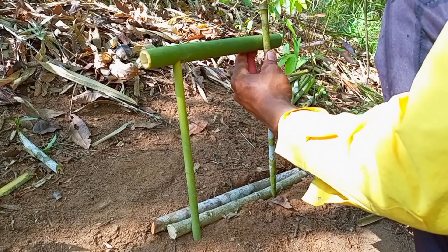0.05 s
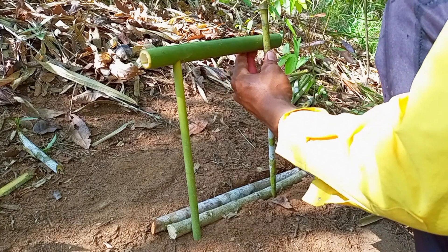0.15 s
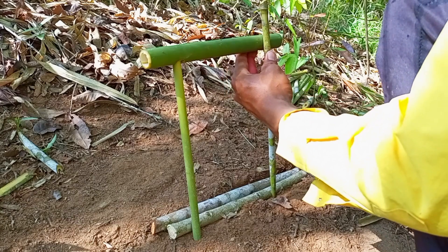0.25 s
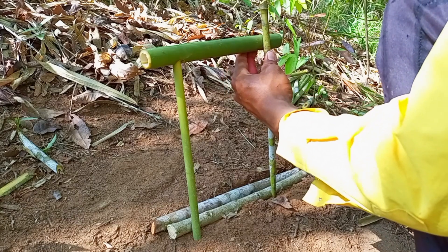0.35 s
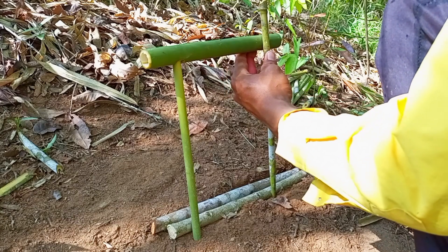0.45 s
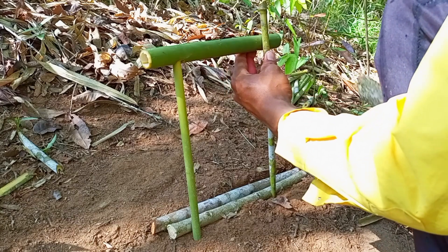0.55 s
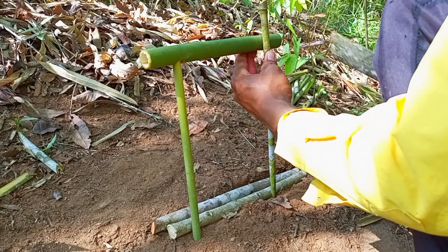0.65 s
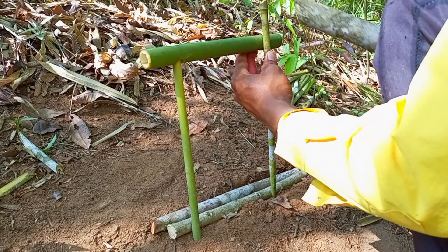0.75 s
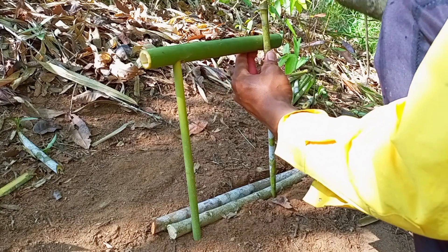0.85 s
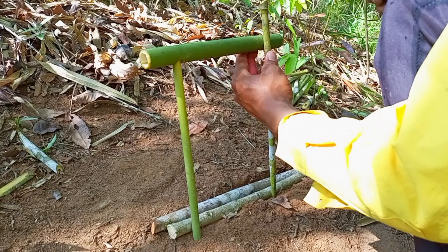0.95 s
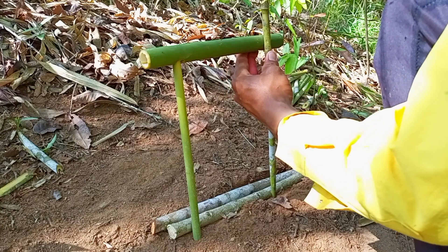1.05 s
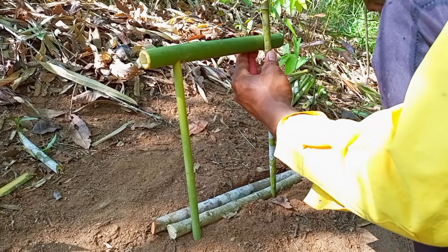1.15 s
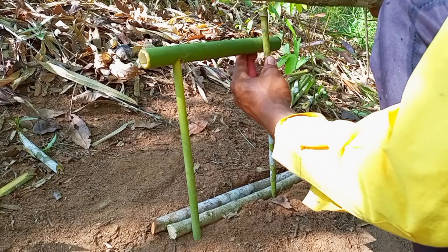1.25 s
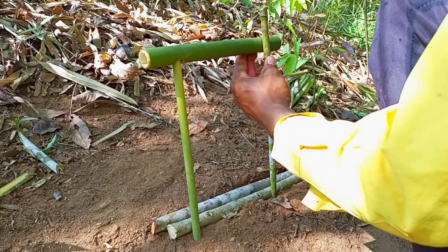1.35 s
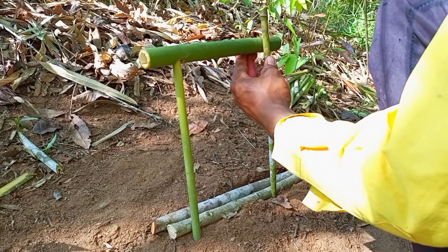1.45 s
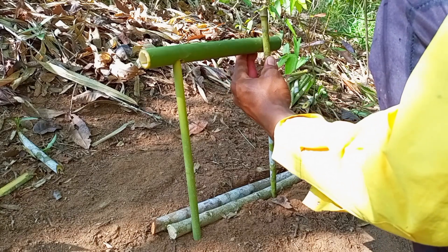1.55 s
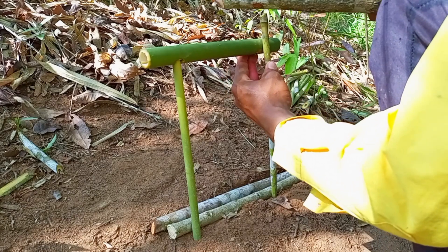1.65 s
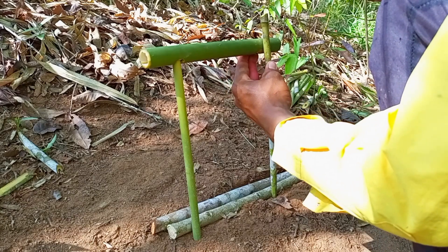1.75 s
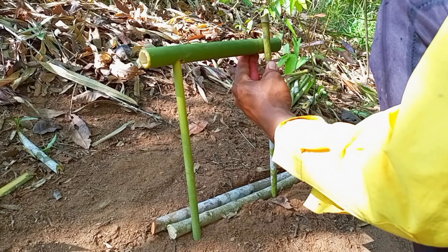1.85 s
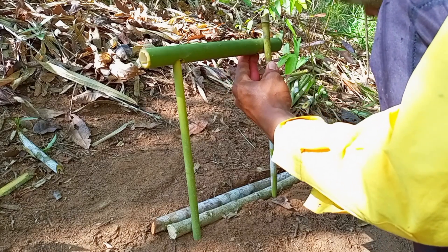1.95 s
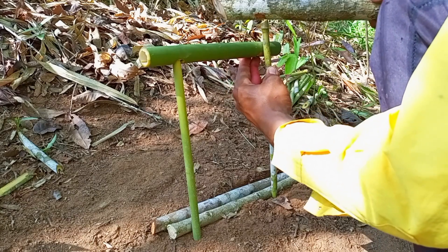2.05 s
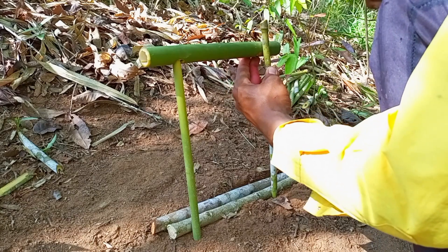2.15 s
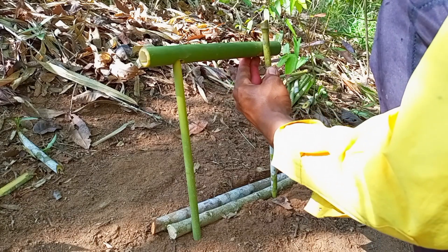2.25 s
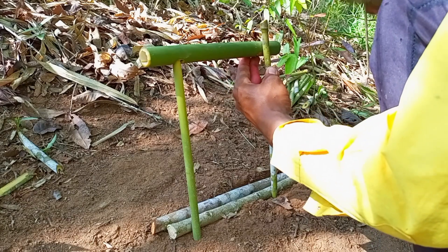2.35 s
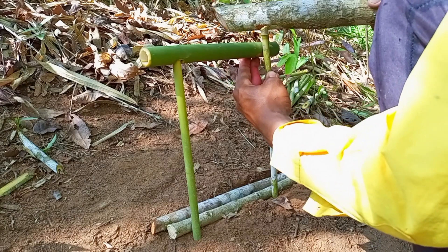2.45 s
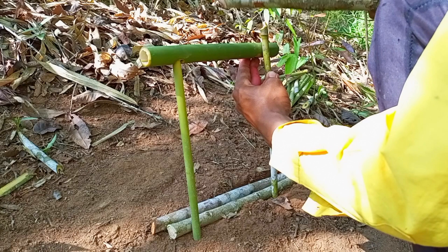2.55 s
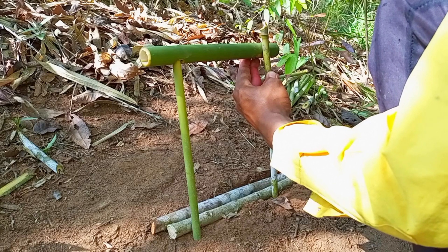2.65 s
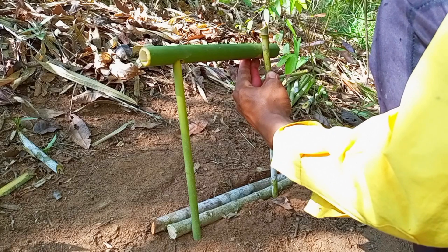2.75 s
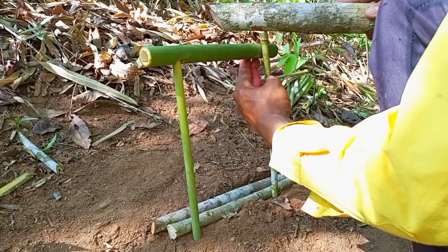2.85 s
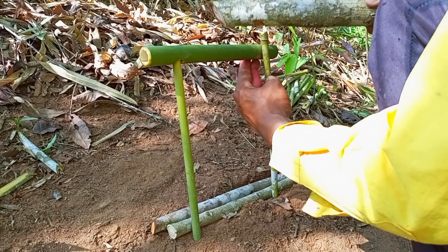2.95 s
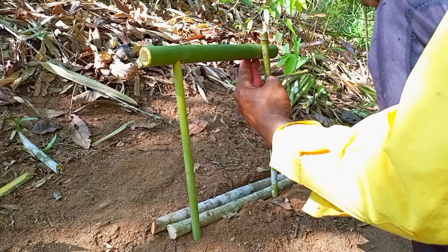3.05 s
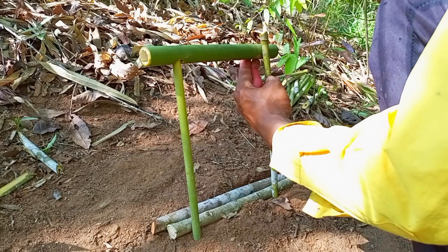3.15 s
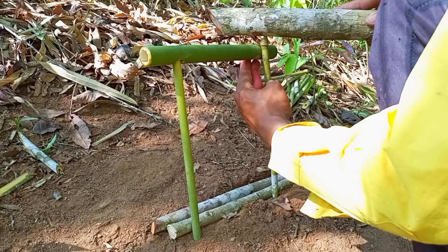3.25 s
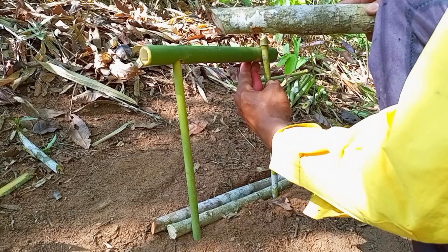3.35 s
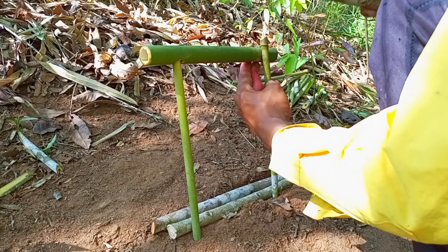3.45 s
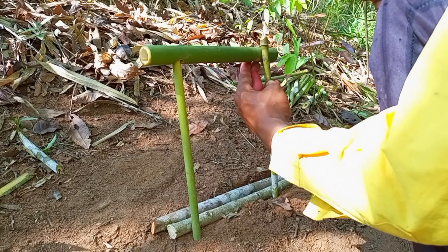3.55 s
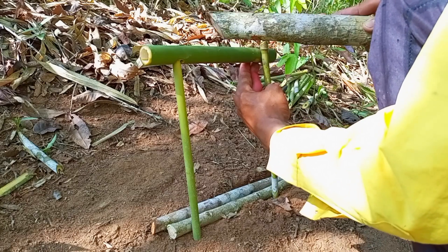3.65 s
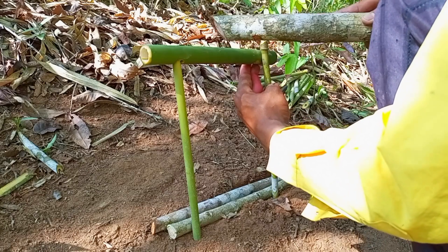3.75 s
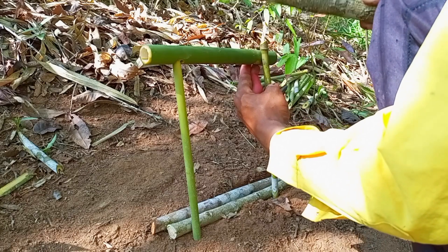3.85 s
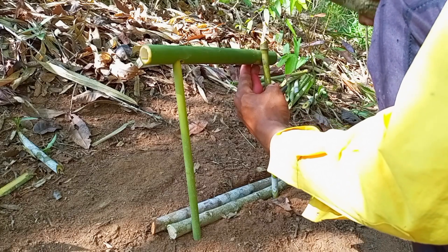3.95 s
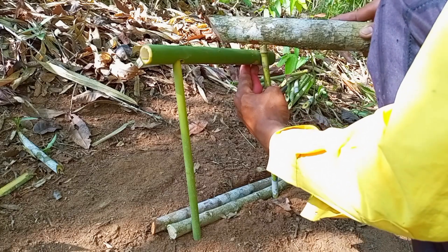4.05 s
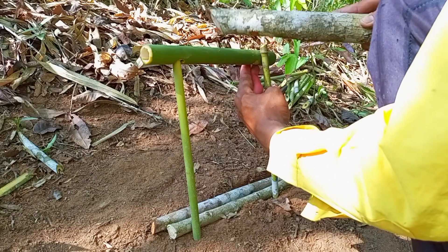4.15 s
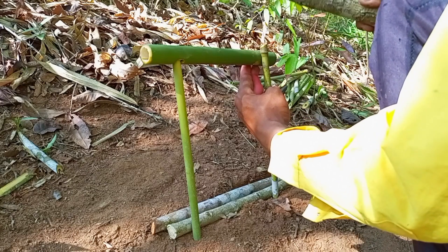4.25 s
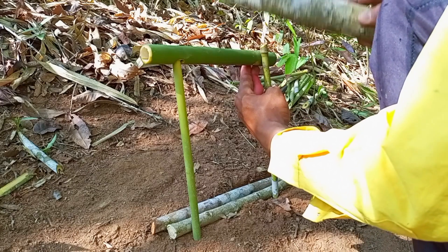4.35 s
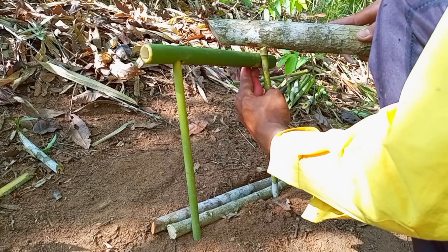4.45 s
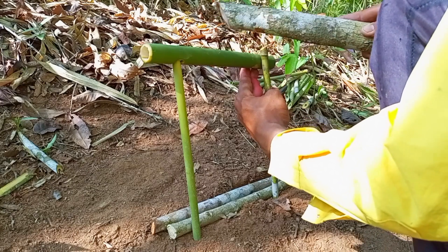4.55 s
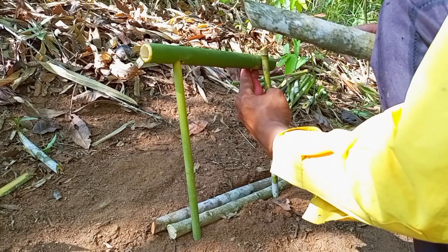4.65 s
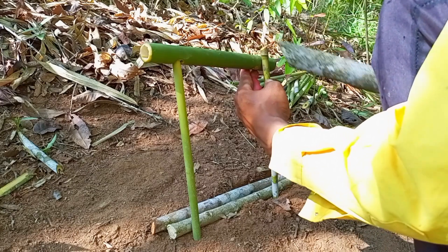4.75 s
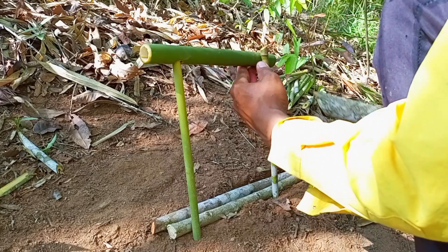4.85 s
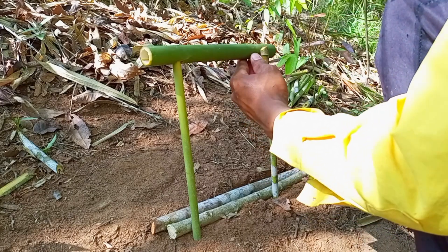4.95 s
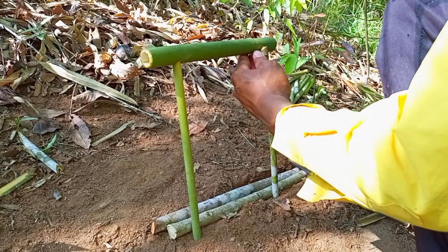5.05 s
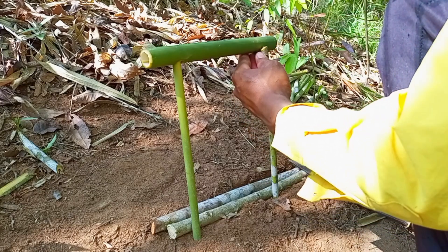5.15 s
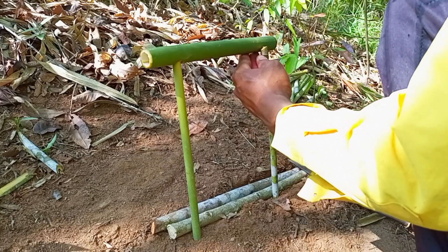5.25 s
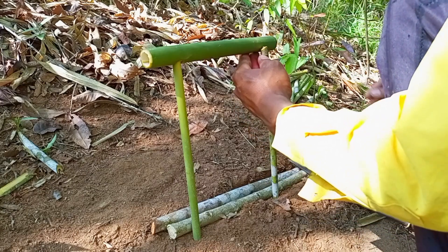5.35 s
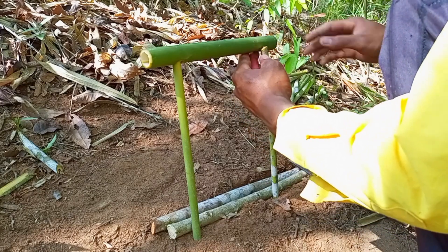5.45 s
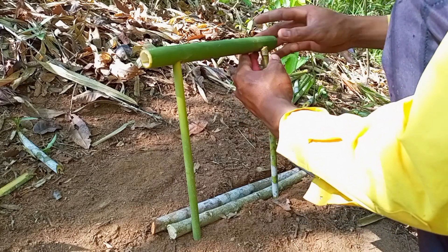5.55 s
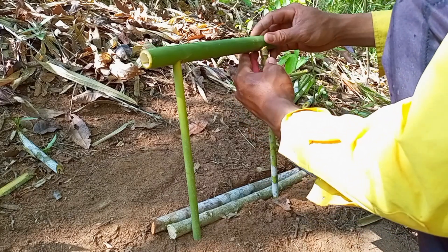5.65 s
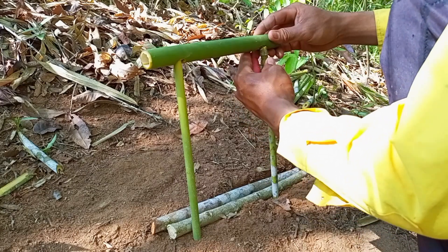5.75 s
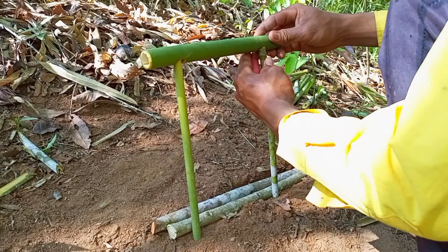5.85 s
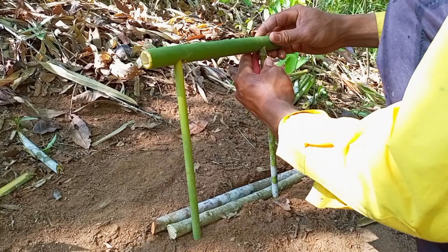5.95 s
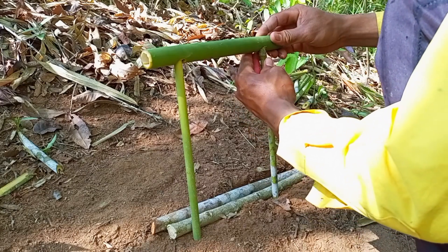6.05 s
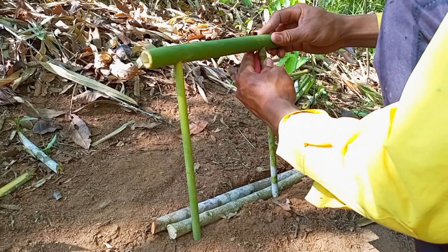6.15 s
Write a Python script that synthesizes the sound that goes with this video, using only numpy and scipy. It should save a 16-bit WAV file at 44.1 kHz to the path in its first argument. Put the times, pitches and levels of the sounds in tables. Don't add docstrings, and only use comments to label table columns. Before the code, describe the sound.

A forest floor heard closely, with a high, dense cicada hiss throughout, its brighter layer thinning after about 2.7 s. Very faint, short bird notes sound far away. From 1.26 s a short log knocks a thin bamboo stake into the ground: nine blows about 0.4 s apart, until 4.46 s. The first is a light tap; they grow firmer to the hardest at 3.3 s, then ease to a light last one. Each is a dry, hollow bamboo knock with a bright crack, dull log body and a small low soil thud that gets fuller and deeper. Loose splints rattle just after several blows, most clearly at 2.07, 2.48 and 2.9 s. At 5.1 s the log touches down softly, then drops and rocks around 5.25 s, while a quick cloth scrape and one sharp, tiny snap occur at 5.23 s. Insects continue, with a barely audible finger rustle near 5.9 s.

```python
import sys
import numpy as np
from scipy import signal
from scipy.fft import rfft, irfft, next_fast_len
from scipy.io import wavfile
from scipy.ndimage import uniform_filter1d, map_coordinates

SR = 44100
rng = np.random.default_rng(int(sys.argv[2]) if len(sys.argv) > 2 else 0)


def magnitude_from_level(level_db):
    exponent = np.asarray(level_db, float) / 20
    return 10 ** exponent


def generate_wav(sig):
    pcm = np.round(np.clip(np.atleast_2d(sig).T, -1, 1) * 32767).astype(np.int16)
    wavfile.write(sys.argv[1], SR, pcm)


N = 273861
CLOCK = np.arange(N) / SR
T = np.arange(SR // 4) / SR


def unit(x):
    return x / np.sqrt(np.mean(x ** 2) + 1e-20)


def along(points, hz):
    f, v = np.transpose(points)
    return np.interp(np.log(hz + 1), np.log(f + 1), v)


def coloured(x, spectrum):
    m = next_fast_len(len(x) + 4096)
    gain = magnitude_from_level(along(spectrum, np.fft.rfftfreq(m, 1 / SR)))
    return unit(irfft(rfft(x, m) * gain, m)[:len(x)])


def patchy(x, depth_db, bins, frames):
    hz, _, z = signal.stft(x, SR, nperseg=2048)
    field = uniform_filter1d(rng.standard_normal(z.shape), bins, 0)
    field = unit(uniform_filter1d(field, frames, 1))
    gain = magnitude_from_level(along(depth_db, hz)[:, None] * field)
    return signal.istft(z * gain, SR, nperseg=2048)[1][:N]


def add(track, s, sound):
    track[round(s * SR):][:len(sound)] += sound


def ring(modes, attack, scatter_db=.7):
    total = np.zeros(len(T))
    for hz, db, t60 in modes:
        decay = magnitude_from_level(db + scatter_db * rng.standard_normal() - 60 * T / t60)
        total -= decay * np.sin(2 * np.pi * hz * T)
    return total * (1 - np.exp(-T / attack))


# (frequency [Hz], t60 [s])
ECHO_DECAY = [(100, .2), (1000, 0.14), (3000, 0.22), (8000, 0.14)]


def echoed(x, wet_db):
    hz, t, z = signal.stft(rng.standard_normal(len(T)), SR, nperseg=256)
    decay = magnitude_from_level(-60 * t / along(ECHO_DECAY, hz)[:, None])
    tail = signal.istft(z * decay, SR, nperseg=256)[1][:len(T)]
    wet = signal.fftconvolve(x, tail / np.linalg.norm(tail))[:len(T)]
    gate = 1 / (1 + np.exp((T - .105) / .009))
    return (x + magnitude_from_level(wet_db) * wet) * gate


# (time [s], tube level [dB], then relative to the tube: crack [dB], stake [dB],
# ring of the far tube end [dB])
BLOWS = [
    (1.261, -29.5, -12.5, -10, -31),
    (1.674, -24, -14.5, -3.5, -29),
    (2.056, -20, -14, -2.5, -28),
    (2.464, -19, -17, -14, -17),
    (2.891, -18.5, -15, -22.5, -27),
    (3.301, -15.5, -11, -5, -22),
    (3.709, -20, -13.5, -7, -18),
    (4.088, -22.5, -9, -1.5, -15),
    (4.462, -27, -6.5, -2, -26),
]


def blows():
    out = np.zeros(N + SR)
    full_blow_db = -24
    for s, db, crack_db, stake_db, far_db in BLOWS:
        soil_db = -50.5 + 5.2 * s + min(db - full_blow_db, 0) - db
        log_db = -3.5 + .6 * soil_db
        body = cross_tube(far_db) + magnitude_from_level(log_db + 8) * log_body() + magnitude_from_level(stake_db + 8.5) * stake(s)
        crack = magnitude_from_level(db + crack_db + 4) * echoed(splint_crack(), wet_db=-17)
        add(out, s + .0001, skin_tick(db) + crack)
        add(out, s + .0008, magnitude_from_level(db) * echoed(body, wet_db=-21.5))
        add(out, s + .0062, magnitude_from_level(db + soil_db + 4) * soil(s))
    return out[:N]


# (frequency [Hz], level [dB], t60 [s])
TUBE_MODES = [(1026.4, 5, 0.028), (804, -4.5, 0.015), (1183, 8, 0.0083), (1365, 1.5, .012),
              (1477, -5, 0.012)]


def cross_tube(far_db):
    far_end = ring([(1084, far_db, .19)], attack=.002) * shaky()
    return magnitude_from_level(-3.0) * (ring(TUBE_MODES, attack=.00052) + far_end)


# (frequency [Hz], level [dB], t60 [s])
LOG_MODES = [(403, 3, 0.031), (264, -3, 0.033), (330, -6, 0.03)]


def log_body():
    return ring(LOG_MODES, attack=.0006)


# (time [s], frequency [Hz])
STAKE_PITCH = [
    (1.26, 1660),
    (3.3, 1866),
    (4.09, 1866),
    (4.46, 1780),
]


def stake(s):
    hz = np.interp(s, *np.transpose(STAKE_PITCH))
    after_db = -33 - .06 * (hz - STAKE_PITCH[0][1])
    modes = [(hz, 0, .022), (.97 * hz, after_db, .3), (1.015 * hz, after_db - 2, .25)]
    return ring(modes, attack=.002) * shaky()


def shaky():
    knots = map_coordinates(rng.standard_normal(30), [1 + T * 95])
    return magnitude_from_level(6 * knots * np.clip(T / .03, 0, 1))


# (frequency [Hz], level [dB], t60 [s])
SPLINT_MODES = [(2180, -1, 0.039), (2308.5, -3, 0.035), (3080, 0.5, 0.021), (3450, -6, .03),
                (4164, -0.5, .025), (4604, 1, .03), (6430, -7, 0.034)]
# (frequency [Hz], level [dB])
SNAP_SPECTRUM = [(300, -15), (1000, -11), (3000, 3.5), (6000, -4.5), (10000, -7.5), (15500, -24.5)]


def contact_noise(t60):
    return coloured(rng.standard_normal(len(T)), SNAP_SPECTRUM) * magnitude_from_level(-60 * T / t60)


def splint_crack():
    snap = contact_noise(t60=.024)
    modes = ring(SPLINT_MODES + [(2720, 0, .018)], attack=.0006, scatter_db=1.8)
    return magnitude_from_level(-7.5) * modes + magnitude_from_level(-6) * snap


# (frequency [Hz], level [dB], t60 [s])
SKIN_MODES = [(5870, -5, 0.0057), (7090, -2.5, .007), (9040, -5, .007), (12500, -5, 0.007),
              (13600, -8.5, .008), (14770, -12.5, .006)]


def skin_tick(db):
    return magnitude_from_level(-16 + .45 * db) * ring(SKIN_MODES, attack=.00015)


# (frequency [Hz], level [dB], t60 [s])
SOIL_MODES = [(112, 1.5, 0.082), (88.5, -0.5, 0.06), (153, -1, 0.064)]


def soil(s):
    deeper = ground_hz(s) / 145
    return ring([(hz * deeper, db, t60) for hz, db, t60 in SOIL_MODES], attack=.0027)


def ground_hz(s):
    return 145 + (200 - 145) * np.exp((THUDS[0][0] - s) / .55)


# (time [s], peak level [dB], tube relative to it [dB])
RATTLES = [
    (2.072, -26.5, -13),
    (2.479, -32.5, -11.5),
    (2.54, -50.5, -5.5),
    (2.907, -30.5, -12),
    (3.749, -54.5, -24.5),
    (3.782, -41, -16),
    (5.045, -63, -33),
    (1.689, -46, -5),
]


def rattles():
    out = np.zeros(N + SR)
    for s, db, tube_db in RATTLES:
        splints = .6 * ring(SPLINT_MODES[3:6], attack=.0008) + .3 * contact_noise(t60=.025)
        tube = ring(SPLINT_MODES[:2] + TUBE_MODES[:1] + [(1140, -8, .13)], attack=.00088)
        add(out, s, magnitude_from_level(db) * echoed(splints + magnitude_from_level(tube_db) * tube, wet_db=-17.5))
    return out[:N]


# (time [s], peak level [dB])
THUDS = [
    (1.281, -47.5),
    (1.688, -39.5),
    (2.113, -37.5),
    (2.501, -32.5),
    (2.935, -33),
    (3.335, -35.5),
    (3.749, -37),
    (4.136, -36),
    (4.492, -32),
]
# (time [s], peak level [dB], frequency [Hz])
LAID = [
    (5.097, -50.5, 135),
    (5.11, -55, 135),
    (5.25, -36, 133),
    (5.269, -45.5, 130),
    (5.284, -62.5, 434),
    (5.305, -66, 436),
    (5.33, -71, 100),
]


def thuds():
    out = np.zeros(N + SR)
    sinking = [(s, db, ground_hz(s)) for s, db in THUDS]
    for s, db, hz in sinking + LAID:
        thud = ring([(hz, 0, .045), (.75 * hz, -12, .06)], attack=.004)
        rounded = uniform_filter1d(np.pad(thud, (60, 0)), size=60)
        add(out, s - .001, magnitude_from_level(db + 6.5) * rounded)
    return out[:N]


# (peak time [s], peak level [dB], rise [dB/s], fall [dB/s])
STROKE = (5.227, -49.5, 600, 680)
# (end time [s], level [dB])
STROKE_TAIL = (5.3, -83)
# (frequency [Hz], level [dB])
STROKE_SPECTRUM = [(350, -24), (600, -2), (850, -16), (1550, 0), (2000, -10), (3200, -2), (5000, -4),
                   (9500, -2), (13000, -4), (15500, -10)]
# (time [s], peak level [dB], frequency [Hz])
SLEEVE_SNAP = (5.2302, -18, 9600)


def brush():
    grain_db = 3.2 * np.repeat(rng.standard_normal(N // 70 + 1), 70)[:N]
    grains = rng.standard_normal(N) * magnitude_from_level(grain_db)
    peak_s, db, rise, fall = STROKE
    stroke = magnitude_from_level(db - np.maximum(rise * (peak_s - CLOCK), fall * (CLOCK - peak_s)))
    end_s, tail_db = STROKE_TAIL
    tail = magnitude_from_level(tail_db) * (CLOCK > peak_s) * (CLOCK < end_s)
    out = magnitude_from_level(5.5) * (stroke + tail) * coloured(grains, STROKE_SPECTRUM)
    snap_s, snap_db, hz = SLEEVE_SNAP
    modes = [(hz, 0, .003), (1.4 * hz, -6, .0025), (.65 * hz, -9, .003), (.35 * hz, -18, .004)]
    add(out, snap_s, magnitude_from_level(snap_db) * ring(modes, attack=.00015))
    return out


# (frequency [Hz], level [dB])
STEADY_SPECTRUM = [(3850, -90), (4000, -47.5), (4300, -28.5), (4600, -32.5), (5370, -11), (5860, -17.5),
                   (6700, -19), (7400, -8.5), (7660, -2.5), (8800, -1), (9600, 0), (11400, -18),
                   (14500, -28), (15600, -36.5)]
# (frequency [Hz], level [dB])
FADING_SPECTRUM = [(3850, -86.5), (4000, -42), (4250, -30.5), (4600, -32.5), (5000, -13.5), (5600, -8),
                   (6700, -2.5), (8300, -10.5), (9400, 1.5), (11000, -3.5), (12000, -9), (13800, -6),
                   (14500, -11.5), (15700, -23.5)]


def insects():
    steady_db = -45.3 + .28 * CLOCK
    fading_db = -46.3 - 2.9 * np.maximum(CLOCK - 2.7, 0)
    depth = [(4100, 7), (4800, 5.6), (5200, 2.2), (9000, 1.5), (13000, 1.6)]  # (frequency [Hz], depth [dB])
    steady = patchy(singers([273, 281, 139], wander=.002, share=.5), depth, bins=3, frames=5)
    fading = patchy(singers([284, 252], wander=.0022, share=.55), depth, bins=3, frames=5)
    choruses = magnitude_from_level(steady_db) * coloured(steady, STEADY_SPECTRUM)
    choruses += magnitude_from_level(fading_db) * coloured(fading, FADING_SPECTRUM)
    return choruses + magnitude_from_level(-78) * cricket(4452, 16) + magnitude_from_level(fading_db - 36) * cricket(4280, 24)


def singers(rates_hz, wander, share):
    total = np.zeros(N)
    for hz in rates_hz:
        drift = map_coordinates(rng.standard_normal(40), [np.linspace(1, 38, N)])
        phase = np.cumsum(hz * (1 + wander * drift)) / SR
        clicks = np.diff(np.floor(phase), prepend=0)
        trees = rng.standard_normal(SR // 8) * magnitude_from_level(-60 * T[:SR // 8] / .12)
        total += unit(signal.fftconvolve(clicks, trees)[:N])
    return share * unit(total) + rng.standard_normal(N)


def cricket(hz, width_hz):
    pitch, size = (map_coordinates(rng.standard_normal(200), [1 + CLOCK * 24]) for _ in range(2))
    return unit(magnitude_from_level(3.5 * size) * np.sin(2 * np.pi * np.cumsum(hz + width_hz * pitch) / SR))


# (time [s], level [dB], frequency [Hz])
CHIRPS = [(.89, -86, 1870), (.29, -81.5, 3200), (1.52, -76, 3120), (1.77, -77.5, 2760), (2.645, -78, 3490),
          (2.68, -77, 3500), (4.651, -82, 3150), (5.0, -80.5, 3115), (5.03, -73, 3470), (5.45, -81, 2880),
          (3.19, -76.5, 3600), (3.95, -82.5, 2780), (5.67, -81, 2770), (5.93, -87, 2900), (6.12, -85, 2800)]
# (first time [s], gap [s], frequency [Hz], level of each note [dB])
HOOT = (.066, .764, 985, [-74, -80.5, -76])


def birds():
    out = np.zeros(N + SR)
    first, gap, hoot_hz, levels = HOOT
    hoots = [(first + k * gap, db, hoot_hz) for k, db in enumerate(levels)]
    swell = np.sin(np.pi * np.clip(T / .056, 0, 1)) ** 2
    for s, db, hz in hoots + CHIRPS:
        waver = np.cumsum(rng.standard_normal(len(T))) * .04
        add(out, s, magnitude_from_level(db + 1.5) * swell * np.sin(2 * np.pi * hz * T + waver))
    return out[:N]


# (start [s], length [s], edge [s], level [dB])
RUSTLE = (5.88, .19, .03, -87.5)


def rustle():
    start, length, edge, db = RUSTLE
    touch = np.clip(np.minimum(CLOCK - start, start + length - CLOCK) / edge, 0, 1) ** 2
    spectrum = [(80, -15), (200, -0.5), (1000, -10.5), (3000, -24.5), (5000, -69)]
    return magnitude_from_level(db) * touch * coloured(rng.standard_normal(N), spectrum)


# (frequency [Hz], level [dB])
RESIDUE_SPECTRUM = [(25, 0), (60, -1.5), (110, -0.5), (200, -3), (600, -9.5), (2500, -10.5), (2850, -7),
                    (3400, -6.5), (3800, -19), (4200, -55.5)]


def residue():
    flicker = patchy(rng.standard_normal(N), [(2000, 1.1), (3000, 4.6)], bins=4, frames=3)
    return magnitude_from_level(-87.5) * coloured(flicker, RESIDUE_SPECTRUM)


def scene():
    work = blows() + rattles() + thuds() + brush() + rustle()
    return (work + insects() + birds() + residue())[None]


def low_pass(x):
    return signal.sosfilt(signal.butter(12, 15800, fs=SR, output="sos"), x)


def record(dry):
    low_cut = signal.butter(5, 74, "high", fs=SR, output="sos")
    high_cut = signal.butter(12, 15750, fs=SR, output="sos")
    mix = signal.sosfilt(np.vstack([low_cut, high_cut]), dry)
    return low_pass(mix)


dry = scene()
out = record(dry)
generate_wav(out)
```